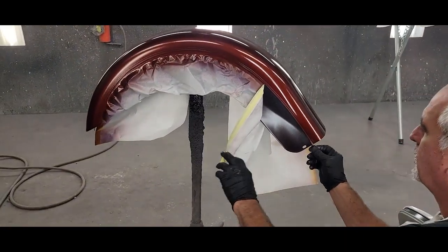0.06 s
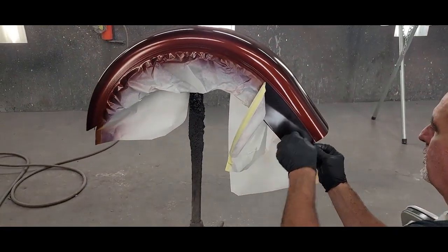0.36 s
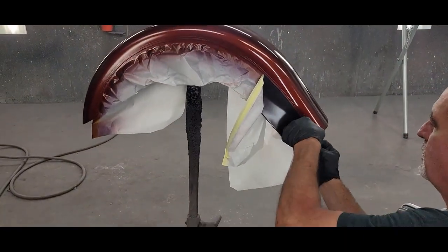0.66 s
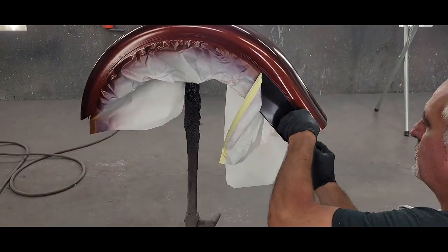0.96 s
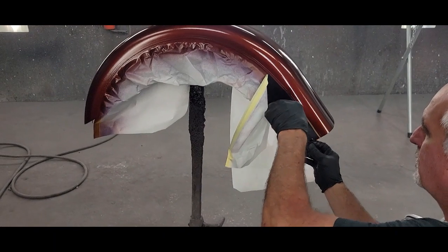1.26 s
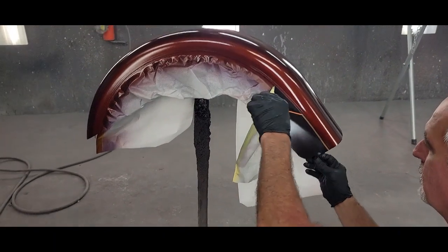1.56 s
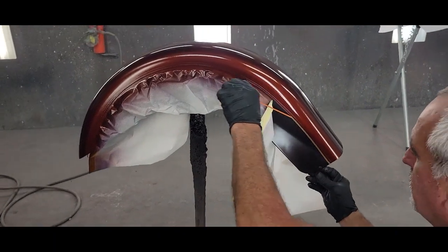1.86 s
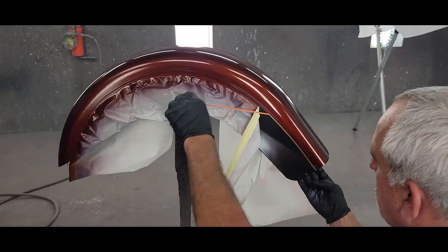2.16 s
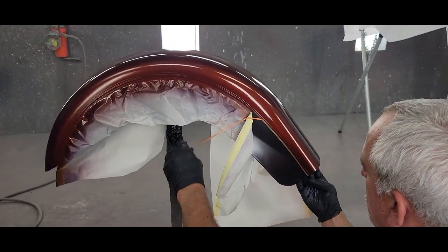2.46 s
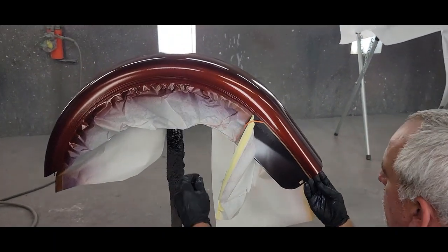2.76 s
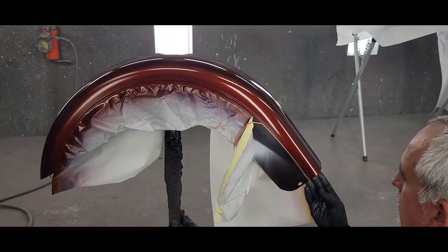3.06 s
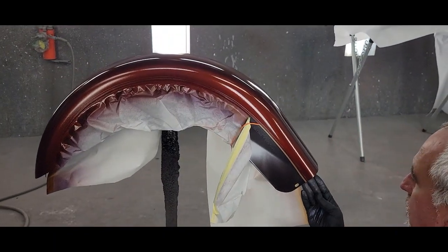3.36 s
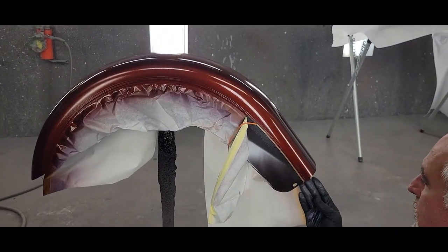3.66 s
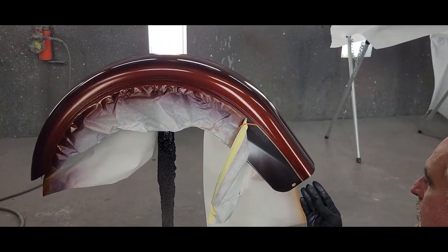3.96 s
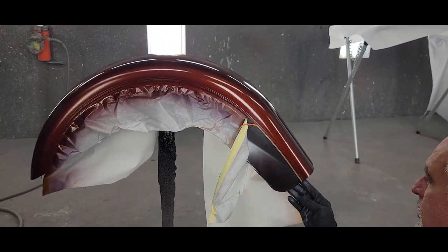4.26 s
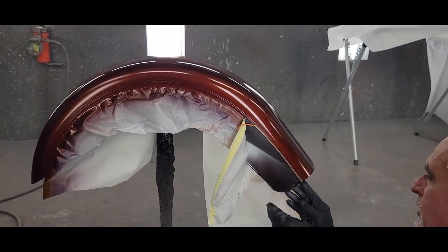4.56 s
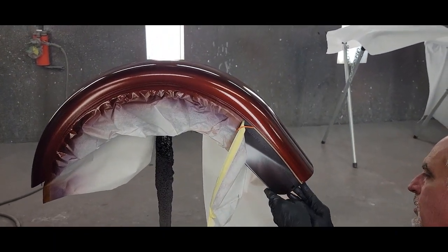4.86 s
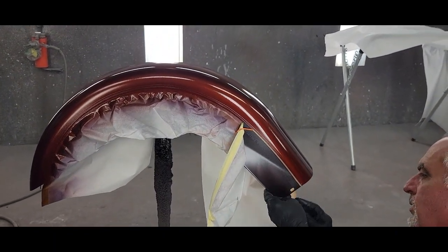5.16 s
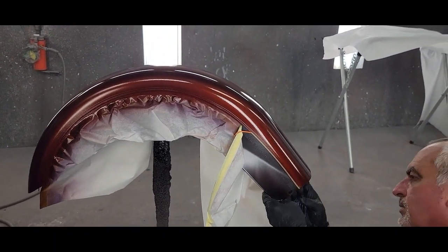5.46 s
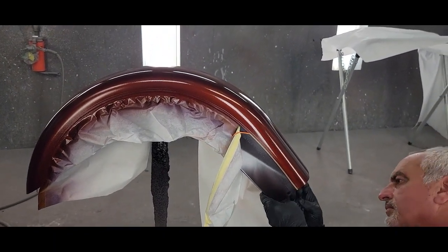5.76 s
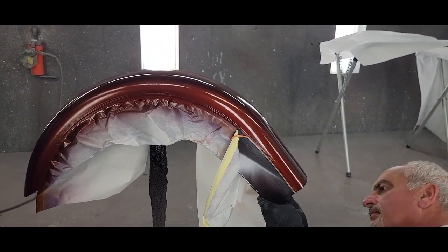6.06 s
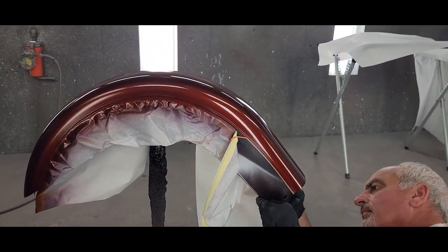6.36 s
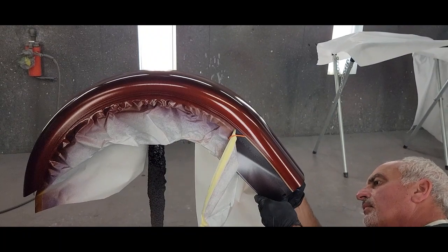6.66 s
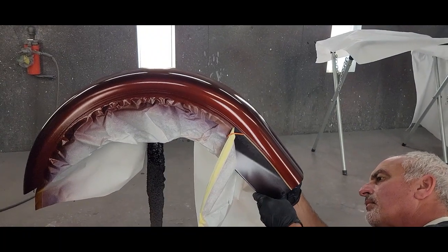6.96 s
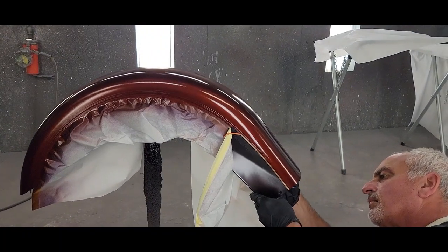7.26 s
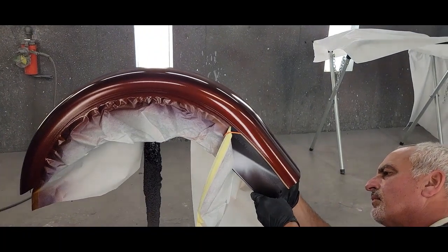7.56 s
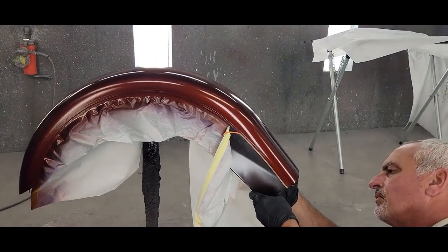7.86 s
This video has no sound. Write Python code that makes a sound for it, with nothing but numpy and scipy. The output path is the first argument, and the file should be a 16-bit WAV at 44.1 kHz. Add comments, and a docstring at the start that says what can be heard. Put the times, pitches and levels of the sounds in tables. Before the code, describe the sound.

A paint booth exhaust fan hums and rumbles steadily while masking tape and paper faintly crackle, with one light hollow knock.

```python
"""From the start, a paint booth's exhaust fan hums as its blades pass, and air rumbles in the duct.
At once, close by, gloved hands pull masking tape and rustle the paper on a painted fender, each pull
a stream of tiny cracks that the hard walls echo. At 0.7 s a crease first snaps; more pulls and snaps
come in bunches. Near 7.4 s something hollow is knocked lightly and rings. One last pull follows,
and the fan runs on to the end."""
import sys
import numpy as np
from scipy import signal
from scipy.fft import rfft, irfft
from scipy.io import wavfile
from scipy.ndimage import uniform_filter1d

SR = 44100
rng = np.random.default_rng(int(sys.argv[2]) if len(sys.argv) > 2 else 0)


def dump_mix(stems):
    """Bounce the given channels to the path in sys.argv[1] as a 16-bit WAV at rate SR."""
    frames = np.atleast_2d(stems).T  # one column per channel
    limited = np.clip(frames, -1, 1)  # hard clip at full scale
    pcm = np.round(limited * 32767).astype(np.int16)
    wavfile.write(sys.argv[1], SR, pcm)


N = 349272
TIME = np.arange(N) / SR
FREQS = np.maximum(np.arange(N // 2 + 1) * SR / N, 1)


def from_db(db):
    """Turn decibels into a number to multiply by."""
    return 10 ** (np.asarray(db) / 20)


def rms_one(x):
    """Scale a sound so that its average power is 1."""
    return x / np.sqrt(np.mean(x ** 2) + 1e-20)


def at_hz(points, hz):
    """Read between a table's rows, giving every octave equal room."""
    known, values = np.transpose(points)
    return np.interp(np.log(hz), np.log(known), values)


def in_time(rows):
    """Join a table's rows by straight lines, one curve per column."""
    times, *columns = np.transpose(rows)
    return np.array([np.interp(TIME, times, column) for column in columns])


def drift(per_s):
    """A wandering line through random values, typically about 1 in size."""
    times = np.arange(0, TIME[-1] + 1, 1 / per_s)
    return np.interp(TIME, times, rng.standard_normal(N)[:len(times)])


def panned(pan_db):
    """Two gains that make the left side pan_db louder than the right."""
    return from_db(np.array([[.5], [-.5]]) * pan_db)


def keep_only(x, hz, kind, order=2):
    """Keep the "low" part, the "high" part or one "band" of a sound."""
    sections = signal.butter(order, np.clip(hz, 10, .45 * SR), kind, fs=SR, output="sos")
    return signal.sosfilt(sections, x + 1e-18)


def ring(clicks, hz, fade_s):
    """Each click starts a tone that dies away by 60 dB in fade_s."""
    shrink, step = from_db(-60 / (fade_s * SR)), 2 * np.pi * hz / SR
    return signal.lfilter([0, np.sin(step)], [1, -2 * shrink * np.cos(step), shrink ** 2], clicks + 1e-18)


def evened(x, seconds):
    """Hold the power steady over spans of the given length."""
    power = uniform_filter1d(np.mean(x ** 2, axis=0), max(int(seconds * SR), 2))
    return x / np.sqrt(power + 1e-20)


# pitches at which the duct and booth ring: f/Hz, width/Hz, boost/dB
DUCT_RINGS = [(71.4, 9, 9.5), (86.5, 3.4, 15.5), (199.1, 7.3, 10), (249, 3.3, 1.5), (337.8, 11, 10.5),
              (527, 25, 6.5), (1065, 9.8, 8), (1330, 33, 3.5), (3720, 12, 4.5)]
# how alike the air sounds at the two microphones: f/Hz, likeness (1 = fully alike)
AIR_LIKENESS = [(40, 1), (190, 0.99), (270, 0.95), (400, 0.31), (550, 0.75), (900, 0.24), (1250, 0.65),
                (2200, 0.24), (8000, .2)]
# which side the air is louder on: f/Hz, left minus right/dB
AIR_BALANCE = [(60, -3), (200, -3.5), (400, -1), (900, -0.7), (3000, 0.5), (4400, -2.5), (6000, 1)]
# how far the wave at the left microphone is ahead: f/Hz, lead/radians
LEFT_LEAD = [(40, 0.48), (190, 0.78), (270, 0.61), (400, 0.61), (550, 2.11), (900, 2.6), (1250, 2.85),
             (3000, 2.4)]

def airflow(colour):
    """Swirling air rings the duct and reaches each microphone a little differently."""
    for hz, width_hz, boost_db in DUCT_RINGS:
        peak = 1 / (1 + (2 * (FREQS - hz) / width_hz) ** 2) ** 2
        colour = colour * np.sqrt(1 + (from_db(boost_db) ** 2 - 1) * peak)
    shared, opposed = rfft(rng.standard_normal((2, N)))
    alike = np.clip(at_hz(AIR_LIKENESS, FREQS), 0, 1)
    pair = np.sqrt(1 + alike) * shared + np.sqrt(1 - alike) * opposed * [[1], [-1]]
    lead = np.exp(1j * at_hz(LEFT_LEAD, FREQS) * np.array([[1], [0]]))
    return rms_one(irfft(pair * colour * panned(at_hz(AIR_BALANCE, FREQS)) * lead, N))


# colour (the mix of low and high) of the rushing air: f/Hz, relative level/dB
AIR_COLOUR = [(15, -27.5), (28, -16), (36, -15.5), (50, -6.5), (62, 1), (100, -3.5), (165, 3), (200, -3),
              (218, -5.5), (243, 2), (295, -12.5), (400, -12.5), (500, -23), (800, -19)]
# colour of the hiss at the intake filters: f/Hz, relative level/dB
HISS_COLOUR = [(500, -5.5), (750, 6.5), (900, -4), (1070, -1), (1300, -10), (2100, -18), (3300, -24),
               (4400, -28), (4800, -28.5), (5400, -34), (7500, -38), (9300, -45.5), (15500, -48.5)]
# slow rise and fall of the rumble: t/s, relative level/dB
RUMBLE_CURVE = [(0, -20.5), (0.35, -20), (0.65, -19.5), (1.85, -17), (2.2, -27), (2.35, -21), (2.92, -21.5),
                (3.15, -15), (3.33, -21), (5.65, -21), (6.3, -20.5), (6.42, -24.5), (6.55, -20.5),
                (7.92, -20.0)]

def fan_air(split_hz=105, roar_top_hz=720, roar_db=-20, hiss_db=-47.5,
            throb_hz=5.71, first_throb_s=0.071, throb_db=1.5, swell_db=1.5):
    """Moving air makes a deep throbbing rumble, a steadier roar above it, and a hiss in the filters."""
    colour = from_db(at_hz(AIR_COLOUR, FREQS))
    deep = 1 / (1 + (FREQS / split_hz) ** 20)
    below_hiss = 1 / (1 + (FREQS / roar_top_hz) ** 10)
    throb = np.cos(2 * np.pi * throb_hz * (TIME - first_throb_s))
    rumble_db = 0.53 + in_time(RUMBLE_CURVE) + throb_db * throb + swell_db * drift(per_s=11)
    rumble = evened(airflow(colour * np.sqrt(deep)), seconds=0.19) * from_db(rumble_db)
    roar = evened(airflow(colour * np.sqrt(1 - deep) * below_hiss), seconds=0.15) * from_db(roar_db)
    hiss = airflow(from_db(at_hz(HISS_COLOUR, FREQS)) * (1 - below_hiss)) * from_db(hiss_db)
    return rumble + roar + hiss


# tones of the hum: multiple of the blade rate, left base level/dB, right base level/dB
BLADE_TONES = [(1, -25.5, -27.5), (2, -13, -26.5), (3, -42, -27.5), (4, -43, -55), (5, -61, -62),
               (7, -69.5, -63.5), (8, -68.5, -64.5), (11, -72, -74), (12, -74.5, -75.5), (13, -79, -76.5),
               (14, -81, -77.5), (15, -76.5, -77), (16, -84, -78.5)]
# the hum's second and third tones swell and dip:
# t/s, tone 2 left change/dB, tone 2 right change/dB, tone 3 left change/dB
HUM_SWELLS = [(0, 0, 2.5, 7.5), (1.2, -1, -1.5, 7), (2.1, -1, -11, 7), (3.8, 0.45, 0.5, 1),
              (4.5, 0.54, 3.5, 3.5), (6.5, 0, 3.5, -1.5), (7.92, 1.2, -0.5, 5.5)]

def fan_hum(blade_hz=118.44, wander_rad=0.072, flutter_db=0.9, left_lead_rad=0.35):
    """Passing blades make a stack of tones; swirls of air shake the higher ones most."""
    blade_phase = 2 * np.pi * blade_hz * TIME + wander_rad * drift(per_s=0.66)
    second_left, second_right, third_left = in_time(HUM_SWELLS)
    swell_db = {2: np.array([second_left, second_right]), 3: np.array([third_left, np.zeros(N)])}
    out = np.zeros((2, N))
    for multiple, left_db, right_db in BLADE_TONES:
        phase = multiple * blade_phase + rng.uniform(0, 2 * np.pi) + np.array([[left_lead_rad], [0]])
        level_db = np.array([[left_db], [right_db]]) + swell_db.get(multiple, 0)
        shake_db = flutter_db * np.sqrt(multiple) * drift(per_s=7)
        out += np.sqrt(2) * np.sin(phase) * from_db(level_db + shake_db)
    return out


# colour of the crackling paper: f/Hz, relative level/dB
PAPER_COLOUR = [(1500, -1.5), (2800, 0.5), (3600, -0.5), (4600, -5.5), (6000, -7.5), (7600, -10),
                (9000, -14.5), (11000, -18.5), (15500, -20.5)]
# pulls on tape and paper:
# t/s, length/s, relative level/dB, low edge f/Hz, treble tilt/(dB per octave), left minus right/dB
PULLS = [(.0, 0.1, -46.5, 1510, 4.5, -2), (0.041, 0.02, -39, 1300, 2.4, -0.5),
         (0.258, .085, -50, 1500, 1.3, 0), (0.754, .29, -63.5, 1514, 1, 11),
         (0.892, .11, -56, 1500, -5, 8.5), (2.331, 0.21, -69.5, 4000, 10.5, 0.5),
         (2.634, 0.009, -48, 1600, -5.5, -3), (2.652, 0.057, -58, 1800, -2.5, 1.5),
         (2.778, 0.019, -58.5, 2200, -6, -1), (5.078, 0.14, -61, 1800, -3, -1.5),
         (5.696, 0.12, -46.5, 3200, -0.5, -2.5), (6.13, .03, -53, 3980, -3, -5),
         (6.167, .147, -53, 1800, 3.5, -1.5), (6.532, 0.22, -61.5, 1600, -3.5, -1),
         (7.566, 0.41, -59.5, 1050, -1, -1.5)]

def tape_and_paper(firm_db=-48, firm_cracks_per_s=5500, uneven_db=2.0, slip_db=1.1, release_s=.028):
    """Glue threads part and creases buckle in a stream of tiny cracks; a harder pull makes more."""
    out, t = np.zeros((2, N)), TIME[:SR // 2]
    hz = np.maximum(np.fft.rfftfreq(len(t), 1 / SR), 1)
    for start, length, level_db, low_hz, tilt_db, pan_db in PULLS:
        cracks_per_s = firm_cracks_per_s * from_db(0.54 * (level_db - firm_db))
        sizes = from_db(uneven_db * np.minimum(rng.exponential(1, len(t)), 4))
        signs = rng.choice([-1, 1], (2, len(t)))
        happens = rng.random(len(t)) < cracks_per_s / SR
        stick_and_slip = from_db(slip_db * drift(per_s=73)[:len(t)])
        cracks = sizes * signs * happens * stick_and_slip
        # a brisk pull is brighter, and a short tight stretch of paper has no lows
        colour = from_db(at_hz(PAPER_COLOUR, hz) + tilt_db * np.log2(hz / low_hz))
        colour /= np.sqrt(1 + (low_hz / hz) ** 10)
        rustle = rms_one(irfft(rfft(cracks) * colour, len(t)))
        rise_s = 0.045 * length  # the hand takes a moment to get going
        pull = (1 - np.exp(-t / rise_s)) * np.exp(-np.maximum(t - length, 0) / release_s)
        at = round(start * SR)
        out[:, at:at + len(t)] += (from_db(level_db) * panned(pan_db) * pull * rustle)[:, :N - at]
    return out


# how long the booth echoes: f/Hz, time to fade by 60 dB/s
ECHO_FADES = [(500, 0.85), (2000, 0.82), (5000, 0.86), (9000, 0.26), (15000, 0.25)]

def wall_echo(x, build_s=0.0057):
    """Many bounces off the walls blur into one echo, different on each side; its highs die first."""
    t, echo = TIME[:SR], 0
    octaves_hz = 250 * 2. ** np.arange(7)
    for low, high in zip(octaves_hz, octaves_hz[1:]):
        band = keep_only(rng.standard_normal((2, SR)), [low, high], "band")
        fade_s = at_hz(ECHO_FADES, np.sqrt(low * high))
        echo = echo + band * from_db(-60 * t / fade_s)
    echo = rms_one(echo * (1 - np.exp(-t / build_s))) / np.sqrt(SR)
    return signal.fftconvolve(x, echo, axes=1)[:, :N]


# single snaps of the paper: t/s, peak level/dB, top edge f/Hz, left minus right/dB
CREASE_SNAPS = [(.7322, -42.5, 4000, 9), (1.034, -39, 7900, 6), (2.639, -35.5, 3600, 2),
                (5.7366, -36.5, 4260, -6), (5.776, -30.5, 4600, -3.5)]

def paper_snaps(decay_s=0.0016):
    """A crease flips over with one short, sharp crack."""
    out, t = np.zeros((2, N)), TIME[:SR // 20]
    for start, peak_db, top_hz, pan_db in CREASE_SNAPS:
        burst = rng.standard_normal((2, len(t))) * np.exp(-t / decay_s)
        crack = keep_only(keep_only(burst, top_hz / 2, "high"), top_hz, "low", order=3)
        at = round(start * SR)
        out[:, at:at + len(t)] += from_db(peak_db) * panned(pan_db) * crack / np.abs(crack).max()
    return out


# the two touches of the knock: t/s, relative level/dB
TOUCHES = [(7.387, -28), (7.394, -25)]
# tones of the hollow thing: f/Hz, relative level/dB, time to fade by 60 dB/s
HOLLOW_TONES = [(560, 2, 0.033), (740, -7.5, 0.027), (1060, 3.5, 0.018), (1344, -2.5, 0.026),
                (1600, -11, 0.019), (2330, -10.5, 0.01), (3200, -17, 0.03), (4120, -24, 0.024),
                (5500, -23, .003)]

def hollow_knock(contact_s=0.0027, roughness=.6, soften_hz=5000):
    """A touch and its bounce, each a click with a little scuff, set something hollow ringing."""
    force, t = np.zeros((2, N)), TIME[:SR // 20]
    for start, level_db in TOUCHES:
        scuff = rms_one(rng.standard_normal((2, len(t))) * np.exp(-t / contact_s)) / np.sqrt(len(t))
        contact = roughness * scuff + (t == 0)
        at = round(start * SR)
        force[:, at:at + len(t)] += from_db(level_db) * rms_one(contact) / np.sqrt(len(t))
    force = keep_only(force, soften_hz, "low", order=1)
    return sum((-1) ** k * from_db(db) * ring(force, hz, fade_s)  # every other tone starts upside down
               for k, (hz, db, fade_s) in enumerate(HOLLOW_TONES))


def scene(widening=0.033):
    """The fan fills the booth; the hands are near, and the knock is farther off, so it echoes more."""
    rustle, snaps, knock = tape_and_paper(), paper_snaps(), hollow_knock()
    direct = from_db(-3.5) * rustle + snaps + from_db(-4.5) * knock
    to_walls = from_db(-6.5) * rustle + from_db(-7.5) * snaps + from_db(-2.5) * knock
    work = direct + wall_echo(to_walls)
    # taking a little of each side from the other makes the rustles, snaps and knock sound wider
    return fan_air() + fan_hum() + work - widening * work[::-1]


def record(dry, ease_s=.01, top_hz=15750):
    """Ease the sound in and out, and cut away the very highest treble."""
    from_end_s = np.minimum(TIME, TIME[-1] - TIME)
    ease = np.sin(np.pi / 2 * np.minimum(from_end_s / ease_s, 1)) ** 2
    return signal.sosfilt(signal.ellip(12, .1, 80, top_hz, fs=SR, output="sos"), dry * ease)


dry = scene()
out = record(dry)
dump_mix(out)
```